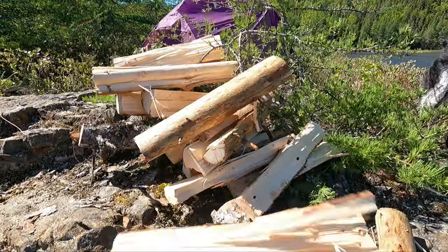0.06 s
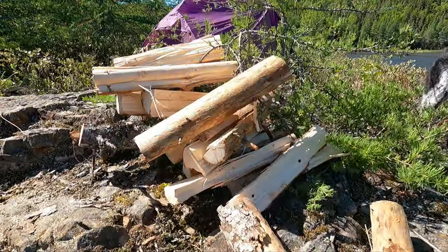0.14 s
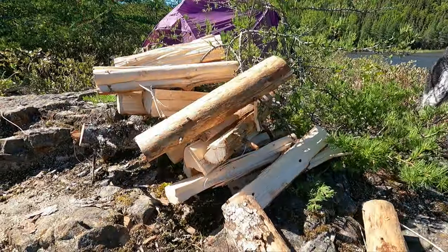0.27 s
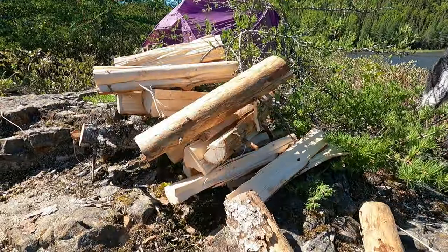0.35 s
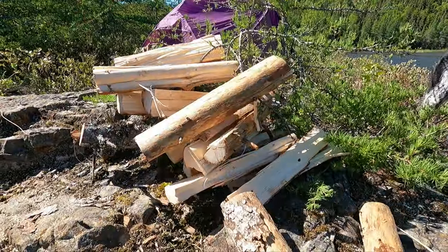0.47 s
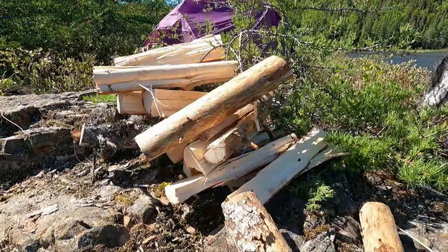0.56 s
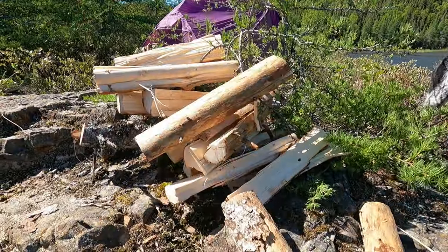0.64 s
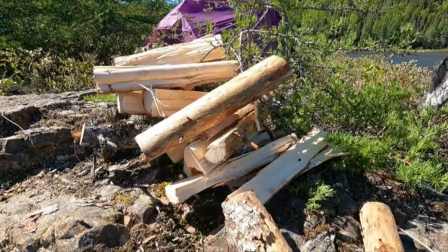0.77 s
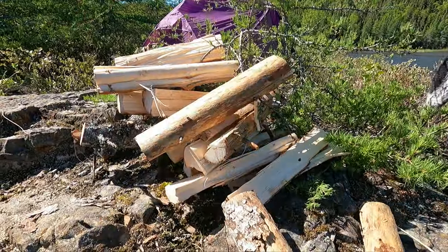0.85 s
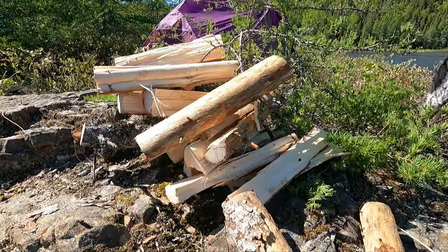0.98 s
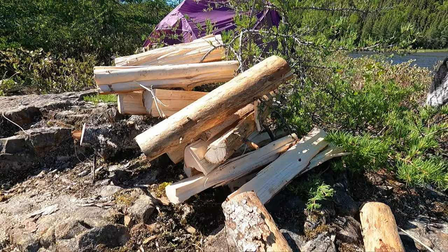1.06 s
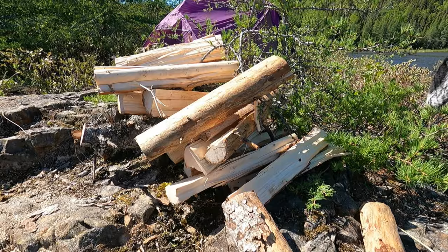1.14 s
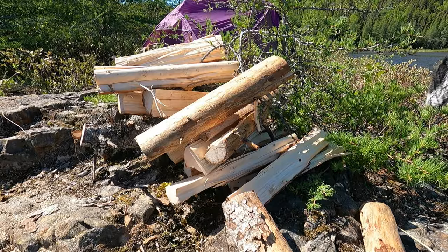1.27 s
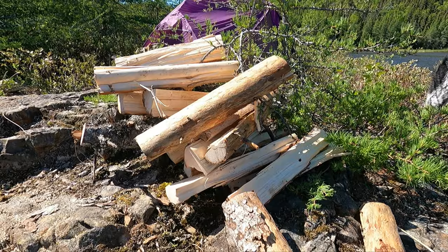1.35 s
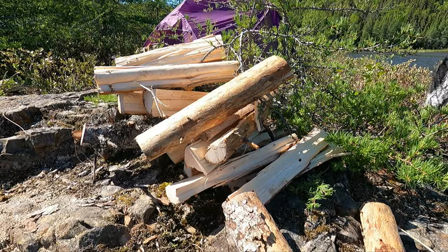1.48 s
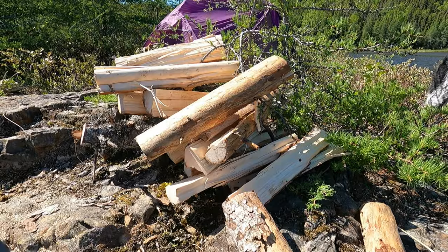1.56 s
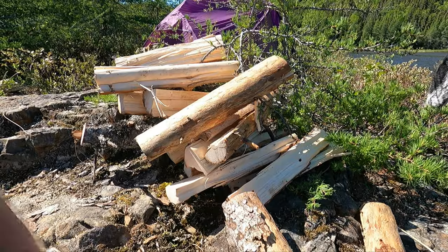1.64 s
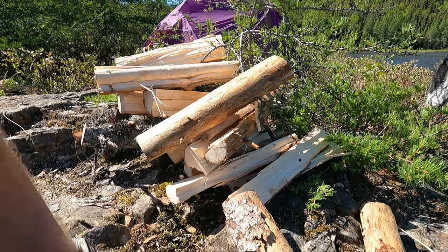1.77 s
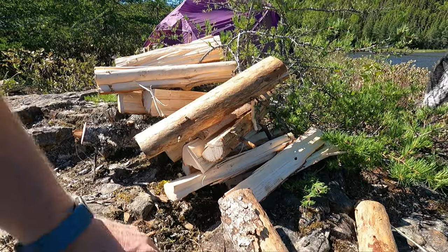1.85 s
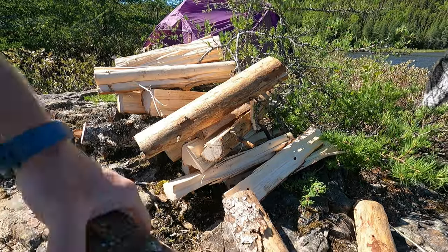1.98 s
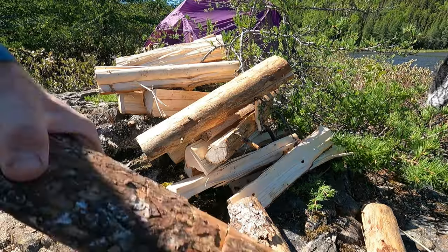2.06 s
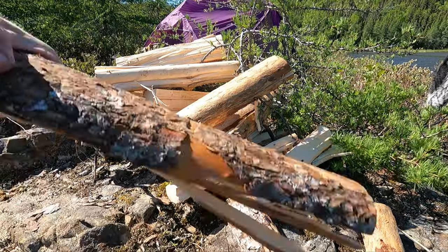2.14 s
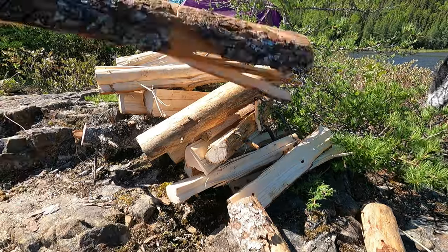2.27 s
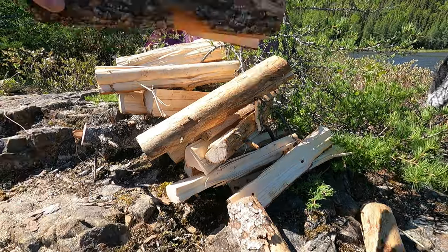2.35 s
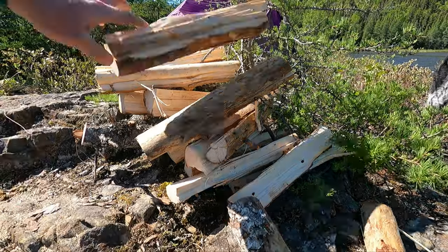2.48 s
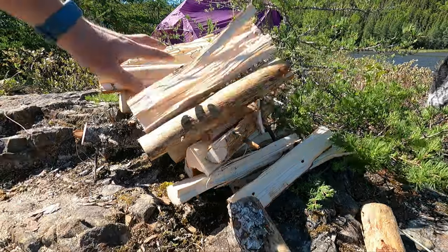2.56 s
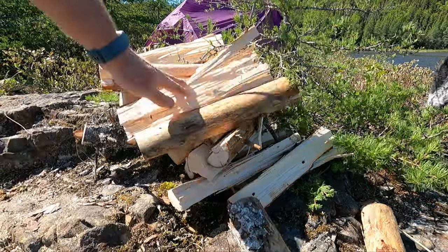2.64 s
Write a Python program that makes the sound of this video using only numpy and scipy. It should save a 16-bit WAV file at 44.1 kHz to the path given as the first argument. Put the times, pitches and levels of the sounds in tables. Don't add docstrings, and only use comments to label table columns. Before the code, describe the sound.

Split logs tumble onto a woodpile close by: dry knocks and bark scraping from the start, a brief skidding screech, then the loudest cracks and hollow thuds around 0.4 to 0.6 s. Light taps follow at 1.0 to 1.3 s, then near quiet. From 1.75 s wood squeaks and bark rustles, with softer thuds around 2 s and small ticks to the end. Wind rumbles low, gusting near 0.5 and 2 s.

```python
import sys
import numpy as np
from scipy import signal
from scipy.fft import rfft, irfft
from scipy.io import wavfile
from scipy.ndimage import uniform_filter1d

SR = 44100
rng = np.random.default_rng(int(sys.argv[2]) if len(sys.argv) > 2 else 0)


def elevation(decibels):
    levels = np.asarray(decibels, float)
    return 10 ** (levels / 20)


def store_wav(level_fs):
    pcm = np.round(np.clip(np.atleast_2d(level_fs), -1, 1) * 32767)
    wavfile.write(sys.argv[1], SR, pcm.T.astype(np.int16))


N = 116865


def evened(x):
    return x / np.sqrt(np.mean(x ** 2) + 1e-20)


def colour(x, points):
    freq_hz, level_db = np.transpose(points)
    bins_hz = np.fft.rfftfreq(len(x), 1 / SR)
    gain_db = np.interp(np.log(bins_hz + 1), np.log(freq_hz + 1), level_db, left=-60, right=-90)
    return irfft(rfft(x) * elevation(gain_db), len(x))


def curve(points):
    time_s, level_db = np.transpose(points)
    return elevation(np.interp(np.arange(N) / SR, time_s, level_db, left=-120, right=-120))


def add(mix, start_s, sound):
    part = mix[round(start_s * SR):][:len(sound)]
    part += sound[:len(part)]


def smooth_twice(x, width):
    return uniform_filter1d(uniform_filter1d(x, width), width)


def lumps(per_s):
    return evened(smooth_twice(rng.standard_normal(N), max(int(SR / per_s), 2)))


def ring(hz, db, t60_s, rise_s, phase_turns, snap=0):
    settle_s = 0.0009
    t = np.arange(SR // 4) / SR
    turns = hz * (t + snap * settle_s * (1 - np.exp(-t / settle_s))) + phase_turns
    return elevation(db - 60 * t / t60_s) * (1 - np.exp(-t / rise_s)) * np.sin(2 * np.pi * turns)


def impacts(per_s, spread_db):
    return elevation(spread_db * np.minimum(rng.exponential(1, N), 4)) * (rng.random(N) < per_s / SR)


def grit(per_s, spread_db, smooth):
    puff = signal.oaconvolve(impacts(per_s, spread_db), np.exp(-np.arange(200) / 90.0))[:N]
    return (smooth + evened(puff)) * rng.standard_normal(N)


def chips(per_s, cycles):
    size = impacts(per_s, 2.4)
    pitches_hz = np.geomspace(450, 7000, num=24)
    kind = rng.integers(0, len(pitches_hz), N)
    out = np.zeros(N)
    for k, hz in enumerate(pitches_hz):
        mode = ring(hz, 0, cycles / hz, 0.00096, 0)[:SR // 10]
        out += signal.oaconvolve(size * (kind == k), mode)[:N] * np.sqrt(hz)
    return evened(out)


# time_s, level_db
GUST = [(0, -37), (.2, -35), (.3, -27), (.5, -25), (.7, -25.5), (.8, -37.5), (1.0, -37.5), (1.19, -36.5),
        (1.45, -43), (1.73, -38.5), (1.9, -27.5), (2.18, -28), (2.22, -32), (2.4, -33), (2.65, -35)]
# freq_hz, level_db
WIND = [(8.8, -34), (15, 2.5), (119, -7.5), (152, -11), (197, -18), (261, -26), (600, -79.5), (780, -105),
        (1320, -120)]
# freq_hz, level_db
AIR = [(180, -23), (300, -1), (498, -20.5), (6400, -29.5), (15000, -69)]


def wind():
    gusty = rng.standard_normal(N) * elevation(1.38 * lumps(27))
    rumble = evened(colour(gusty, WIND)) * curve(GUST) * elevation(1.0)
    air_db = -65 + 2.2 * lumps(18)
    return rumble + elevation(air_db) * evened(colour(rng.standard_normal(N), AIR))


# time_s, level_db
SCRAPE = [(0, -42), (.03, -47), (.045, -57.5), (.11, -36), (.16, -48), (.19, -44.5), (.28, -46),
          (.34, -41.5), (.38, -42), (.47, -36.5), (.495, -60), (.515, -41.5), (.535, -35), (.6, -38.5),
          (.625, -59.5), (.75, -71)]
# freq_hz, level_db
BARK = [(250, -5.5), (460, -21.5), (4100, -23), (7000, -34.5), (9000, -45), (13300, -56.5), (15700, -78.5)]
# time_s, level_db
LIFT = [(1.0, -81.5), (1.3, -64.5), (1.55, -53.5), (1.72, -59.5), (1.75, -51.5), (1.8, -60), (1.86, -51),
        (1.93, -56), (2.03, -44.5), (2.08, -53.5), (2.12, -48), (2.165, -55.5), (2.19, -61), (2.3, -56),
        (2.41, -70), (2.53, -68), (2.57, -53), (2.65, -59)]
# freq_hz, level_db
RUSTLE = [(150, -30), (250, -4), (1070, -6), (2190, -10), (7500, -19), (12000, -42), (15600, -65),
          (22000, -120)]
# start_s, length_s, level_db
FLAKES = [
    (.08, .08, -62),
    (1.815, .105, -67),
    (1.96, .07, -67),
    (2.015, .05, -62),
    (2.54, .085, -67),
]
# freq_hz, level_db
FIZZ = [(8000, -10), (13300, -5), (15500, -14)]


def rubbing():
    scrape = evened(colour(evened(grit(1000, 3.2, 1.0)) + 0.58 * chips(330, 38), BARK)) * curve(SCRAPE)
    rustle = evened(colour(evened(grit(1100, 3.4, 2.1)) + 0.29 * chips(400, 23), RUSTLE))
    rustle = rustle * elevation(2.0 * lumps(40) + 4) * curve(LIFT)
    flaking = np.zeros(N)
    for start_s, length_s, level_db in FLAKES:
        add(flaking, start_s, elevation(level_db) * np.hanning(int(length_s * SR)))
    return scrape + rustle + flaking * evened(colour(grit(1530, 2.5, 2.5), FIZZ))


# freq_hz, level_db
CRACK = [(300, -19), (870, -1.5), (2470, -6), (3700, -6), (6500, -18.5), (9000, -28), (13000, -47),
         (15700, -63.5)]


def crack(db, hz, t60_s):
    lead_s, rise_s = 0.0081, 0.00067
    t = np.arange(SR // 8) / SR - 0.02
    swell = np.exp(np.minimum(t, 0) / lead_s - 1.5)
    decay = elevation(-60 * t / t60_s) * (1 - 1.2 * np.exp(-abs(t) / rise_s))
    z = rng.standard_normal((2, len(t)))
    drive = z[0] * elevation(3.5 * evened(uniform_filter1d(z[1], 60)))
    sing = sum(signal.lfilter(*signal.iirpeak(hz * k, 4.0 * k, SR), drive) for k in range(1, 9))
    return elevation(db) * np.where(t < 0, swell, decay) * evened(colour(evened(drive) + 0.3 * evened(sing), CRACK))


# start_s, level_db, ring_hz, crack_rel_db
KNOCKS = [(0.024, -24, 590, -18.5), (0.07, -30, 846, -13), (0.144, -33, 588, -7), (0.197, -11.5, 1016, -55),
          (0.213, -22, 460, -18.5), (0.238, -12.5, 469, -21), (0.301, -28.5, 1700, -2.5),
          (0.363, -25, 978, -16.5), (0.385, -12.5, 584, -11), (0.391, -6.5, 804, -12.5),
          (0.43, -10, 396, -15), (0.523, -12, 862, -33), (0.528, -10, 800, -28), (0.559, -17, 2092, -21),
          (0.585, -26, 553, -18), (0.659, -43, 2450, -10.5)]
# start_s, level_db, ring_hz, crack_rel_db
TAPS = [(1.025, -36, 845, -18), (1.067, -60, 806, -6.5), (1.083, -33, 1430, -19.5), (1.137, -57, 533, 3.5),
        (1.151, -36, 1202, -26), (1.233, -20.5, 556, -26), (1.291, -35.5, 853, -21),
        (1.749, -30, 1476, -16.5), (1.968, -23.5, 480, -15.5), (2.027, -27, 1010, -32),
        (2.104, -26, 460, -31), (2.145, -28, 904, -30), (2.277, -32, 1003, -21), (2.356, -36, 1410, -22.5),
        (2.481, -64, 2350, 5.5), (2.583, -43, 643, -1.5), (2.604, -41.5, 1000, -0.5)]
# freq_ratio, level_db
PARTIALS = [(0.971, 1), (0.632, -5.5), (2.2, -11.5), (0.78, -13), (2, -13.5)]


def knocks(rows, crack_t60_s):
    ring_s, ring_cycles, rise_s, snap = 0.011, 8.46, 0.0014, 0.83
    wood, chance = np.zeros(N), rng.random((len(rows), 2 * len(PARTIALS) + 1))
    for (start_s, level_db, ring_hz, crack_rel_db), c in zip(rows, chance):
        for k, (ratio, part_db) in enumerate(PARTIALS):
            hz = ring_hz * ratio * (1 + 0.12 * (c[k] - 0.5) * (k > 0))
            phase_turns = 0.4 * c[k + len(PARTIALS)]
            add(wood, start_s, ring(hz, level_db + part_db, ring_s + ring_cycles / hz, rise_s, phase_turns, snap))
        splinters = crack(level_db + crack_rel_db + 5, 550 + 350 * c[-1], crack_t60_s)
        add(wood, max(start_s - 0.02, 0), splinters)
    return wood


# start_s, level_db, ring_hz, t60_s
TICKS = [(.0248, -10, 700, .011), (0.0718, -33.5, 1340, 0.023), (0.1043, -33, 2914, 0.013),
         (0.1111, -34.5, 2480, 0.019), (0.1329, -33.5, 1940, 0.035), (0.138, -22.5, 301.4, .03),
         (0.1448, -29, 4600, 0.011), (0.1445, -33, 7140, 0.0089), (0.1984, -23, 1398, 0.04),
         (0.232, -16.5, 436, .015), (0.2363, -27, 2550, 0.013), (0.295, -37, 5040, 0.089),
         (0.301, -22.5, 3616, 0.021), (.302, -25, 4286, 0.021), (0.3607, -29.5, 2190, 0.017),
         (.39, -9, 2270, .02), (0.4301, -19, 1918, .03), (.457, -31, 901, 0.055), (0.53, -23, 2690, 0.021),
         (0.5598, -28.5, 4060, 0.013), (0.887, -54.5, 1805, 0.023), (1.025, -31.5, 1400, 0.012),
         (1.0448, -46.5, 2200, 0.011), (1.0683, -49, 3250, 0.015), (1.09, -50, 5575, 0.031),
         (1.1378, -47.5, 6020, 0.008), (1.14, -45, 1940, 0.018), (1.2474, -32, 400, 0.03),
         (1.291, -40, 700, 0.013), (1.4604, -43, 1500, 0.024), (1.5389, -38, 1610, 0.014),
         (1.7393, -39.5, 3130, 0.0085), (1.8755, -36, 1770, 0.01), (1.892, -40, 3060, 0.016),
         (1.9673, -36, 2380, 0.016), (2.042, -40, 4010, 0.014), (2.0905, -42, 1420, .02),
         (2.103, -33, 1560, 0.036), (2.1918, -49.5, 2970, 0.024), (2.2897, -44.5, 2470, 0.033),
         (2.3828, -47.5, 3970, 0.014), (2.4812, -43.5, 3900, 0.023), (.4297, -6, 310, .018),
         (2.5654, -44.5, 2240, 0.015), (2.584, -33, 2600, 0.011), (2.6084, -33, 3190, 0.015),
         (2.647, -38, 2500, .01)]


def ticks():
    rise_s, click_s, click_db, rough_per_hz = 0.0013, 0.0012, -13, 1 / 3600
    out, z = np.zeros(N), rng.standard_normal((len(TICKS), 2, SR // 4))
    t = np.arange(SR // 4) / SR
    click_shape = t / click_s * np.exp(2 - 2 * t / click_s)
    for (start_s, level_db, ring_hz, t60_s), (flutter, hiss) in zip(TICKS, z):
        roughness = rough_per_hz * ring_hz
        rough = 1 + roughness * evened(smooth_twice(flutter, 14))
        click = elevation(level_db + click_db) * roughness * click_shape * evened(colour(hiss, CRACK))
        add(out, start_s, rough * ring(ring_hz, level_db + 2, t60_s, rise_s, 0) + click)
    return out


# start_s, hollow_db, push_rel_db
THUDS = [(0.236, -29, -17), (0.39, -11.5, 1.5), (0.424, -11, -4.5), (0.531, -10.5, -31), (0.556, -22, 6),
         (0.577, -12.5, -5), (0.609, -21.5, 2), (0.943, -34.5, 10.5), (1.233, -34, -8), (1.858, -33.5, -5),
         (1.906, -27.5, -6), (1.971, -15.5, 4.5), (1.99, -15, -9), (2.024, -18.5, -13), (2.043, -17.5, -9),
         (2.094, -22, -31), (2.16, -29, -4), (2.302, -32, 12.5), (2.368, -33.5, 11.5), (2.588, -34.5, 11.5)]
# freq_hz, level_db, t60_s
HOLLOW = [(178.5, 3, 0.1), (236.8, -3.5, 0.074), (300.8, -3, 0.046), (400, -16.5, 0.089),
          (143.3, -11.5, 0.13)]


def thuds():
    push_hz, push_t60_s = 55.7, 0.12
    out, chance = np.zeros(N), rng.random((len(THUDS), len(HOLLOW) + 1))
    for (start_s, hollow_db, push_rel_db), c in zip(THUDS, chance):
        for k, (hz, part_db, t60_s) in enumerate(HOLLOW):
            add(out, start_s, ring(hz * (0.9476 + 0.13 * c[k]), hollow_db + part_db + 2, t60_s, 0.0023, 0))
        push = ring(push_hz * (0.91 + 0.39 * c[-1]), hollow_db + push_rel_db + 6, push_t60_s, 0.0035, 0)
        add(out, start_s, push)
    return out


# freq_hz, level_db
SCREECH = [(800, -5), (2200, -1), (3400, 0.5), (5600, -6.5), (7800, -20.5), (12000, -47.5)]


def screech():
    start_s, length_s, slip_hz, level_db, swell_db = 0.371, 0.022, 1120, -17, 12
    out, u = np.zeros(N), np.arange(0, length_s, 1 / SR) / length_s
    wobble = evened(uniform_filter1d(rng.standard_normal(len(u)), size=60))
    phase = 2 * np.pi * np.cumsum(slip_hz * (1 + 0.02 * wobble)) / SR
    slips = sum(np.cos(k * phase + k * k) for k in range(1, 10))
    fade = np.minimum(u / 0.23, 1) * np.minimum((1 - u) / 0.1, 1)
    shape = elevation(level_db - swell_db * (1.5 - u)) * fade
    add(out, start_s, shape * evened(colour(slips, SCREECH)))
    return out


# start_s, length_s, first_hz, last_hz, level_db
SQUEAKS = [(0.865, 0.14, 660, 567, -64), (1.03, 0.023, 1120, 1261, -51.5), (1.02, 0.11, 753, 956, -63.5),
           (1.086, 0.019, 1870, 3390, -56), (1.153, 0.043, 1153, 2450, -57.5),
           (1.737, .12, 347, 1702, -44.5), (1.781, 0.021, 1100, 1180, -52.5), (1.877, .025, 630, 1305, -37),
           (2.276, 0.059, 400, 777, -44.5), (2.321, 0.056, 727, 1933, -42), (2.325, 0.026, 500, 820, -44)]


def squeaks():
    out = np.zeros(N)
    for start_s, length_s, first_hz, last_hz, level_db in SQUEAKS:
        u = np.arange(0, length_s, 1 / SR) / length_s
        z = uniform_filter1d(rng.standard_normal((3, len(u))), size=20, axis=1)
        pitch_wobble, level_wobble = evened(uniform_filter1d(z[:2], 150, axis=1))
        rasp = evened(uniform_filter1d(z[2], 50))
        pitch_hz = first_hz * (last_hz / first_hz) ** (u ** 1.6) * (1 + 0.042 * pitch_wobble)
        phase = 2 * np.pi * np.cumsum(pitch_hz) / SR
        tone = (np.sin(phase) + 0.045 * np.sin(2 * phase)) * (1 + 0.7 * rasp)
        fade = np.minimum(u / 0.036, 1) * np.minimum((1 - u) / 0.18, 1)
        add(out, start_s, elevation(level_db + 3.5 + 2.05 * level_wobble - 6 * u) * fade * tone)
    return out


def scattered(wood):
    t = np.arange(SR // 5) / SR
    scatter = rng.standard_normal(len(t)) * elevation(-60 * t / 0.087) * (t > 0.004)
    return wood + elevation(-13.0) * signal.oaconvolve(wood, scatter / np.linalg.norm(scatter))[:N]


def scene():
    wood = knocks(KNOCKS, crack_t60_s=0.04) + knocks(TAPS, crack_t60_s=0.032) + squeaks()
    return (wind() + rubbing() + scattered(wood) + ticks() + thuds() + screech())[None]


def low_pass(x):
    return signal.sosfilt(signal.butter(12, 15720, fs=SR, output="sos"), x)


def record(dry):
    return low_pass(dry)


dry = scene()
out = record(dry)
store_wav(out)
```